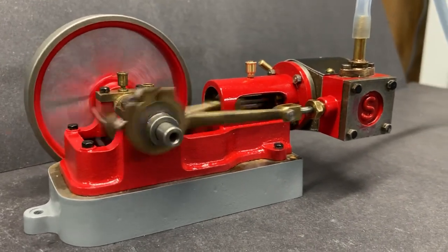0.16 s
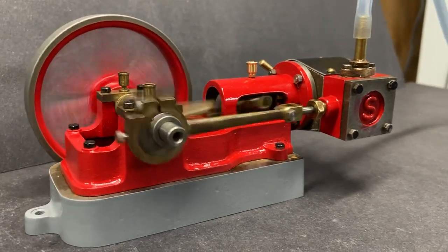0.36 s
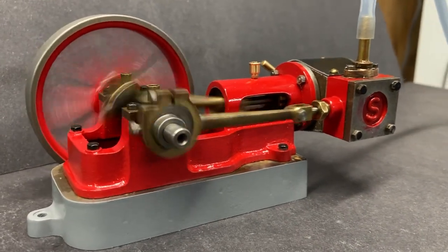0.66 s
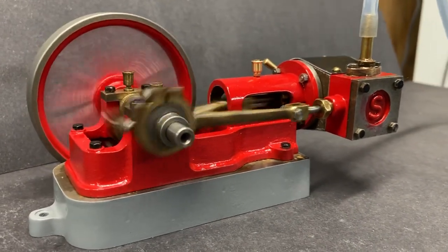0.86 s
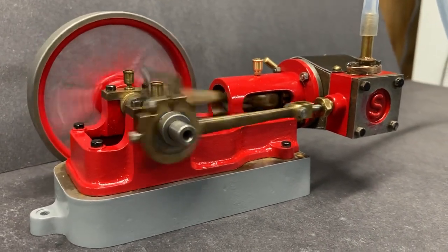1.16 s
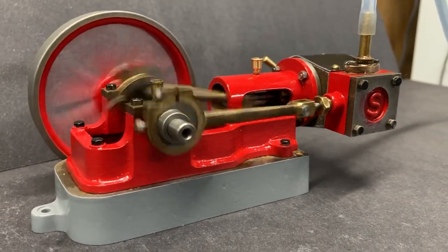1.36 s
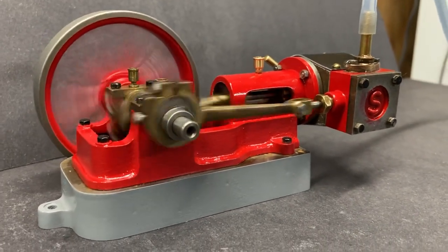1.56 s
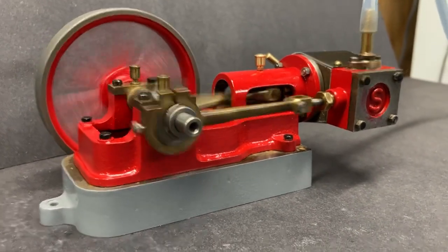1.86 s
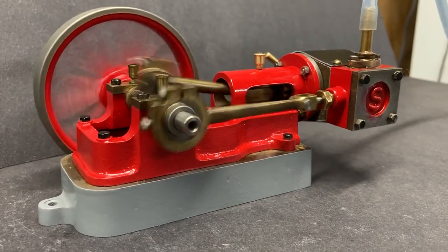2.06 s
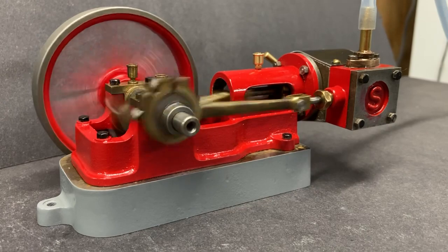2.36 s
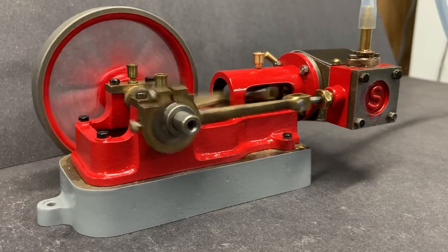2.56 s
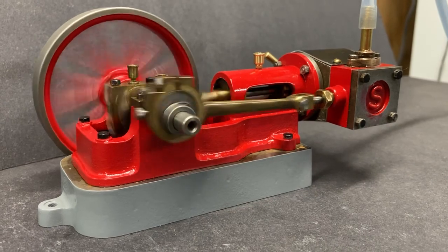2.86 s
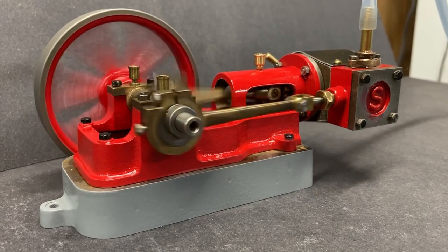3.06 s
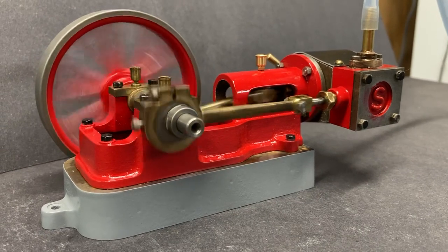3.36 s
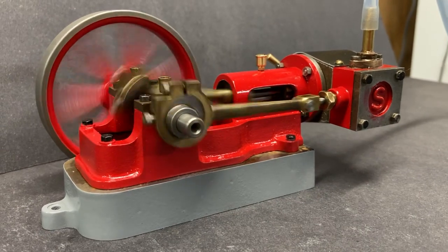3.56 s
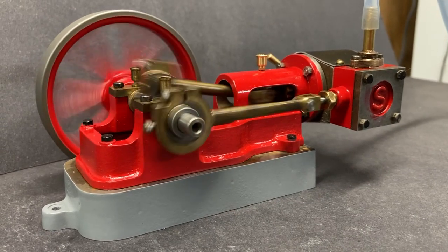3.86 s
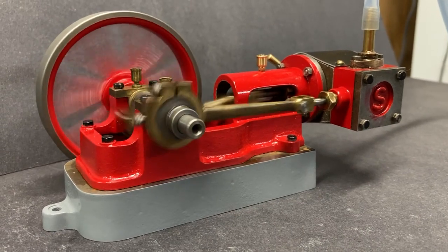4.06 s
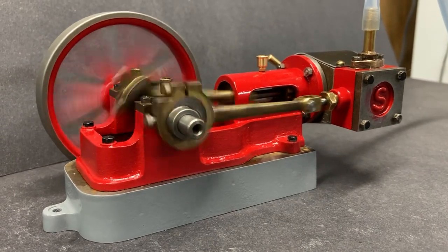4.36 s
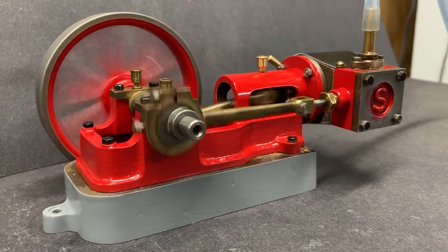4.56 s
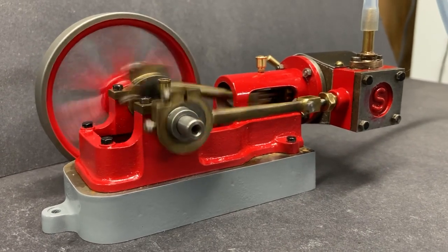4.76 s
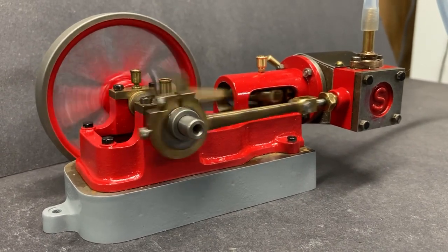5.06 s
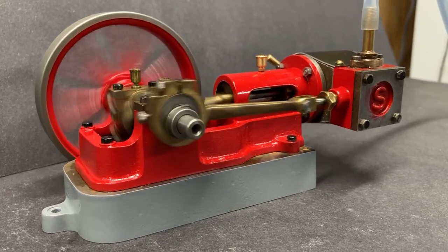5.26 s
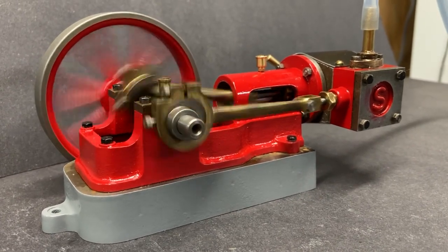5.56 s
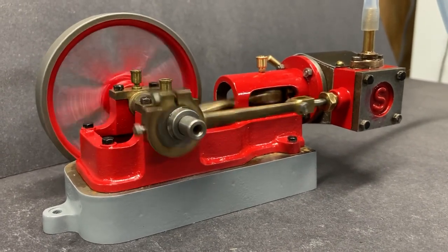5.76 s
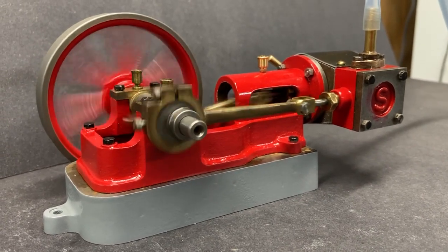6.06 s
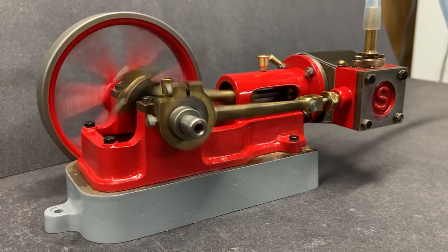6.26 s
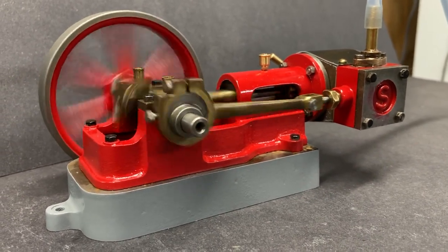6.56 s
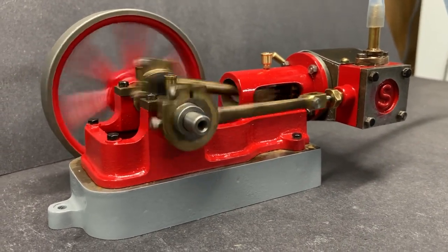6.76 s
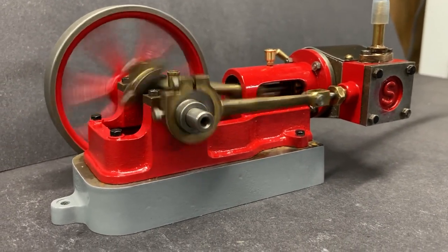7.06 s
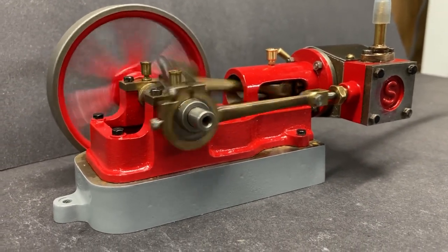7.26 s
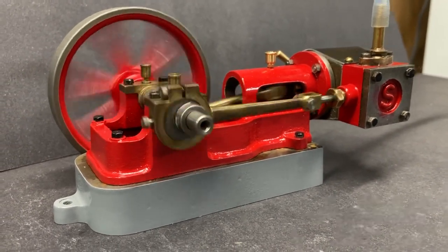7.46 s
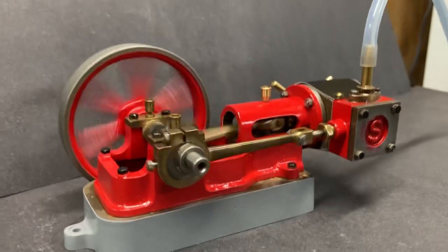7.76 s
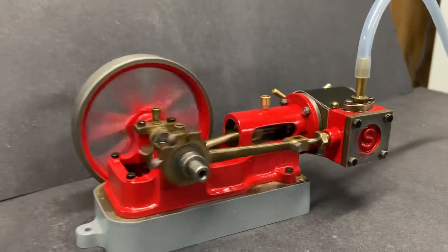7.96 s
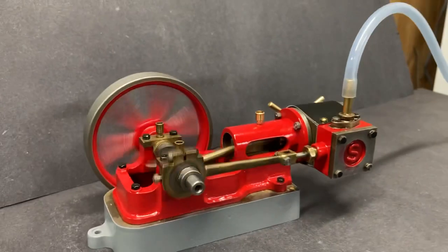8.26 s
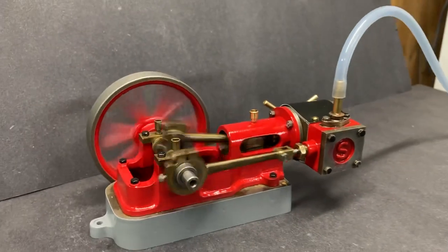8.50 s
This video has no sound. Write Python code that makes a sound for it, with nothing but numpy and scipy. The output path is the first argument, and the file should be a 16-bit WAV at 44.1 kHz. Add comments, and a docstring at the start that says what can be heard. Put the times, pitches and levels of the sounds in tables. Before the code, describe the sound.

From 0 s a small model engine is already running on compressed air, very close, in a small room. Each turn repeats a tight round of dry metallic knocks, ticks, rod rattle and a low bench thump, at about 8.5 turns a second, never quite identical. Two bright hissing exhaust puffs per turn sweep slightly up and down, speckled with tiny oil cracks; sharper spits come at 0.2 and 2.3 s. Steady leaking air, thin whistles and low rumble lie beneath. From about 2.5 s the pace eases to about 7.5 turns a second, with looser, more prominent bearing slap and rattles. After 6 s it slows further, to just above six turns a second around 6.7 s, puffs weakening. Between 7.5 and 7.9 s the microphone draws back: main knocks soften, the thin top hiss and hollow ring stand out more. The engine keeps running to the end at about 8.6 s.

```python
"""A small single-cylinder model steam engine knocks on a workbench, run on compressed air at six to nine turns a second.
Slack in rod and bearings gives every turn the same round of knocks, never quite alike; they ring frame and bench.
Each turn also lets two hissing puffs out of the exhaust, with small cracks of spitting oil.
Air leaks steadily, with faint whistles and a hollow ring, over a low room rumble.
A close microphone pair hears it in a small room and draws back from the engine near the end."""
import sys
import numpy as np
from scipy import signal
from scipy.fft import rfft, irfft
from scipy.io import wavfile

SR = 44100
rng = np.random.default_rng(int(sys.argv[2]) if len(sys.argv) > 2 else 0)


def pcm_store(signal):
    """Save signal as 16-bit PCM."""
    levels = np.round(np.clip(np.atleast_2d(signal), -1, 1) * 32767)
    wavfile.write(sys.argv[1], SR, levels.astype(np.int16).T)


N = 380583
TIME, HZ = np.arange(N) / SR, np.fft.rfftfreq(N, 1 / SR)
USUAL_SPEED = 7.6  # turns a second at which the table levels hold


# the turns of the crank: (start [s], then the force [dB] of the crank knock, its bright tick,
#   the rod's rattle, the thump on the bench, the return blow, the scrape)
TURNS = [(0.0021, -1, -12, -14, -2, -3, 0.0), (0.1171, 1, 0, -3, 1, -1, 2),
         (0.2358, 1, 0.0, -4, -2, 1, -13), (0.3543, 1.5, -4.0, -7.0, 4, -2, -2.0),
         (0.4715, 0, -4, -2, 0, -0.5, 2), (0.5878, 2, -3.0, -1.5, -2, -2, -12),
         (0.7057, 1.5, -3, -7.0, 2, -3, 0), (0.8218, 0.5, -2.0, -7.0, -2, 1, 3),
         (0.9374, -0.5, -7.5, -11, 2.5, -1.5, -12), (1.0534, 0, 6, -14, 1.5, -6, -3),
         (1.1687, 0.5, -3, -11, 2, 0, 3), (1.2828, 1.5, 2.5, -9, 1, 0.5, -10.0),
         (1.3978, 1.5, 5.0, -5, 2.5, -2, -5.5), (1.5125, 1, 3.0, 3, 1.5, 0, 6),
         (1.6264, 2, 4, -2, 0, -0.5, -7.0), (1.74, 2, 5.0, -9, 2.5, 0.5, -1),
         (1.8548, 0, 3, -4.5, 1.5, -0.5, -3), (1.9691, -1, 8.5, -2, 2.0, -1, 4),
         (2.0843, 1, 7.0, -3, 1.5, -3, -9), (2.2014, 0.5, 4, -9, -1.5, -1.5, 2.0),
         (2.3177, -3, 2, -9, 0.5, -1.5, 0), (2.4344, -1, 6.5, -7.0, 2.5, -4.5, -12),
         (2.552, -1.0, 4, 4, -0.5, -1, -7), (2.6718, 0, 8, -3, -0.5, -2, -10.0),
         (2.7993, 1, 2.0, 1, -3, -0.5, -9), (2.9286, 1, 1, 8.5, -1.5, -3.5, 5.0),
         (3.0603, 0.5, -3, -7.0, -1, 0.5, 0), (3.1955, 2, 3.0, 2.0, 1.5, -2, 7),
         (3.3321, 1.5, 1.0, 0, -1, 0, 6), (3.4728, -1.5, 7.5, -5, -4, -0.5, 6.5),
         (3.6125, 0.5, 3, -4, -2.5, 1, 5.5), (3.7502, -0.5, -3, -1.0, -2, 1.5, 4),
         (3.8856, 1.5, 3.0, -7, -1.5, -1, -10.0), (4.0182, 2, -3.0, -3.0, 1.5, -3, -9.5),
         (4.1504, -2, 2, 5.5, -0.5, -1.5, -1.0), (4.2802, -0.5, 1.5, 1, -7, -4, 6.5),
         (4.4076, -1, -3, -8, 0, 0.5, -10.0), (4.5367, 2, 4, -1, 1, -2, -3),
         (4.6649, 0.5, 1, 8, -2.5, -3.5, 1.5), (4.7951, 1.0, 5, -2, 1, -1, 7.5),
         (4.929, -1.5, -7.0, 0, 0.5, 1.5, 0.5), (5.0653, 0.5, -2, -7, 2.5, -0.5, -10.0),
         (5.2004, 0.0, -4, -9, 1.0, -2.5, -10.0), (5.3352, -3, -0.5, 2.5, -2.5, -1.5, -10.0),
         (5.4699, -2.5, -3.0, 6.0, -3.5, -0.5, -1.0), (5.6061, -1.5, 4, 10, 0.5, -1, -10.0),
         (5.7424, -0.5, 4, 9, -2.5, -3, -7.0), (5.8817, 1, 5, 10.0, -3.5, -4.5, -8),
         (6.0227, 0.5, -1, 8.5, -3.5, -1.5, -10.0), (6.1653, 0, 2, -1.5, 0.0, -0.5, -6),
         (6.3127, 0, -5, -14, 0, 2.5, -5.5), (6.4684, 0.0, -2.0, 8, -8.0, -4, -10.0),
         (6.6294, -0.5, -9, -5, -5, -1, -10.0), (6.797, -0.5, -5.5, -11, -2, 1, 2.0),
         (6.9583, 0.0, -1.0, 7.5, -2.5, -2.5, -10.0), (7.114, 0, -1.5, -7.0, -2, -0.5, 0),
         (7.2714, -0.5, -2.0, 7.5, -3, -4, -10.0), (7.4296, -2, -8, -7.0, -1.0, -2.5, -8),
         (7.5895, -2.5, -3, 3, 0.5, -1.0, -3), (7.7455, -6, -10.0, 1, -10, 0.5, -12),
         (7.9078, -4.5, -7.5, -7.0, -3, 1, 0), (8.0649, -5, -8, 4.5, -4, -4.5, -12),
         (8.2194, -5.5, -7, -7.0, -6.5, -5.5, -5), (8.3687, -6.5, -3.0, -5, -1.5, -3.5, 0.5),
         (8.52, -5, 0, 5.5, -2, -3, -9)]
# names of those forces, in column order
DRIVES = ["knock", "tick", "rattle", "thump", "return", "scrape"]
# slap of the crank bearing: (time [s], level above the force of the knock [dB])
SLAP = [(0, -10), (2.35, -4), (2.7, -1.5), (5.5, 0), (5.75, 0.5), (6.15, 1), (6.4, -0.5), (7.5, 0.5),
        (8, 5.5), (8.63, 3)]


def turns(even_back_db=-3.0):
    """When each turn starts, and how hard it drives each kind of blow, in dB."""
    start, *columns = np.transpose(TURNS)
    forces = dict(zip(DRIVES, columns))
    forces["slap"] = forces["knock"] + np.interp(start, *np.transpose(SLAP))
    forces["even"] = even_back_db * drawn_back(start)
    return start, forces


def speed(t):
    """Turns a second above the usual speed, from the lengths of the turns."""
    start = np.transpose(TURNS)[0]
    middle = (start[1:] + start[:-1]) / 2
    return np.interp(t, middle, 1 / np.diff(start)) - USUAL_SPEED


def crank():
    """Turns that the crank has made, at every moment."""
    start = np.transpose(TURNS)[0]
    end = 2 * start[-1] - start[-2]  # the last turn lasts as long as the one before
    return np.interp(TIME, np.append(start, end), np.arange(len(start) + 1))


def strokes(cycle, drive, position, scatter, speed_db, vary_db, advance=0):
    """Times and strengths, turn by turn, of an event at one crank position; speed shifts its place and level."""
    start, forces = cycle
    period = np.append(np.diff(start), start[-1] - start[-2])
    faster = speed(start + period * position)
    late, harder = rng.standard_normal((len(start), 2)).T
    at = start + period * (position - advance * faster + scatter * late)
    return at, amp(forces[drive] + speed_db * faster + vary_db * harder)


# the blows of one turn: (force that drives it, crank position [turns], part struck,
#   advance [turns per extra turn a second], scatter [turns], chatter decay [s],
#   level at each of the four colour frequencies [dB], gain with speed [dB per extra turn a second])
BLOWS = [ ("slap", 0.00704, "crank", 0, 0.0003, 0.00017, 2.2, 5.5, -1.6, -11.5, 0),
         ("tick", 0.014, "crank", 0, 0.00091, 0.001, -23, -34, -22, -4.5, 0),
         ("knock", 0.017, "crank", 0, .0005, 0.00045, 2.5, -9.5, 6.4, -15.5, 0.3),
         ("even", .078, "rod", 0.003, .002, 0.0008, 0, 1.4, -4.5, -10, 0.42),
         ("rattle", .118, "rod", 0, 0.005, 0.002, -2, -4.5, -10, -18, -0.71),
         ("rattle", .168, "rod", 0, .005, 0.002, 0, -12, -10, -20, -1),
         ("even", .35, "rod", 0, 0.005, 0.0022, 2.5, -0.026, -2.3, -17, 0.3),
         ("even", .449, "rod", -0.002, .004, 0.0017, 0, -1, 3.5, -15, 1.2),
         ("even", .56, "slide", 0.0037, 0.0044, 0.0014, 2, -3.5, -26, -36, 3.2),
         ("return", .598, "slide", .006, 0.0013, 0.00029, 8.2, 7.9, 1, -22, -0.42),
         ("even", .648, "slide", 0.0057, 0.0032, 0.0008, 1.7, -7, -30, -36, -0.5),
         ("scrape", .76, "rod", 0, 0.01, .002, -2.5, -4.5, -1, -9, 0)]
# colour frequencies: (frequency [Hz])
COLOUR_HZ = [200, 1000, 3000, 10000]


def blows(cycle, chatter=0.65, vary_db=0.73, chatter_low_hz=700, size=900):
    """Slack is taken up at fixed crank positions: a click and a brief chatter, as hard as that turn drives it."""
    t = np.arange(size) / SR
    thin = signal.butter(2, chatter_low_hz, "highpass", fs=SR)  # chatter is too light to move the bench
    clack = signal.butter(2, [900, 3400], "bandpass", fs=SR)
    out = np.zeros(N)
    for drive, position, part, advance, scatter, chatter_s, *colour_db, speed_db in BLOWS:
        at, force = strokes(cycle, drive, position, scatter, speed_db, vary_db, advance)
        fade = np.exp(-t / chatter_s)
        noise = rng.standard_normal((len(at), size)) * fade / np.linalg.norm(fade)
        contact = chatter * signal.lfilter(*thin, noise)
        contact[:, 0] += 1  # the click
        contact /= np.hypot(1, chatter)
        colour = causal(list(zip(COLOUR_HZ, colour_db)))
        contact = signal.fftconvolve(contact, colour[None], axes=1)
        sound = signal.fftconvolve(contact, frame(part, at), axes=1)
        # chatter changes a clack's colour, not its strength
        energy = np.linalg.norm(signal.lfilter(*clack, sound[:, :size]), axis=1)
        level = force * energy.mean() / energy
        out += placed(at, sound * level[:, None])
    return out


# modes of bench and engine frame: (frequency [Hz], width [Hz], relative level struck at the crank [dB],
#   at the rod [dB], at the slide [dB], level added once the microphone has drawn back [dB])
MODES = [(59, 9.1, -12, -7, 9, 2), (89, 29, 1, -1, -12, -9), (115, 16, -2, 8.5, 2, 1),
         (190.6, 12.5, -4, 9, 5.5, 2), (217, 99, 1.5, -11, 0.5, 0), (263, 57, 4, -0.5, 6.5, 4),
         (351, 44, 3.5, 3, 3.5, -1.5), (453, 43, 3.5, 0, -1, 2), (597, 40, -11, -2, -1.5, 6),
         (728, 31, -19, -5, -2, 0), (803, 98, -19, 0.5, -5.5, -3), (946, 100, -4.5, 1, -2.5, -3.5),
         (1112, 36, 1, 6, 3.5, 9), (1356, 230, 3.5, -4.5, -1.5, 1.5), (1624, 217, 7.5, 1.5, 3.5, 2),
         (1800, 306, 5, -0.5, 1.5, 1.5), (2163, 315, 1.5, -4, -1, 4.5), (2408, 335, 0.5, -2.5, -1, 2.5),
         (2636, 210, 0, -3.5, -2.5, -2), (3127, 132, 1, 2, -4.5, 1.5), (3328, 350, -4, -1.5, -4.5, -6),
         (4230, 2700, -17, -16, -18, 0), (5960, 600, -1, -11, -22, 3), (8740, 1200, 3, -8.5, -1.5, 0),
         (12300, 10500, -7.5, -11.5, -15.5, 4.5)]
# names of the parts struck, in column order
PARTS = ["crank", "rod", "slide"]


def frame(part, at, vary_db=2.0, detune=0.018, level_db=-0.72, size=5000):
    """Ring of bench and iron frame, a row a stroke: the contact point shifts, so the modes differ a little."""
    t = np.arange(size) / SR
    hz, width, *part_db, back_db = np.transpose(MODES)
    decay = np.exp(-np.pi * np.outer(width, t))
    rings = 2 * np.pi * width[:, None] / SR * decay * np.sin(2 * np.pi * np.outer(hz, t))
    chance = rng.standard_normal((len(at), len(hz) + 1))
    mode_db = level_db + part_db[PARTS.index(part)] + np.outer(drawn_back(at), back_db)
    mode_db = mode_db + vary_db * chance[:, 1:]
    weights = (-1) ** np.arange(len(hz)) * amp(mode_db)  # neighbouring modes start in opposite directions
    stretch = 1 + detune * chance[:, 0]
    return np.array([np.interp(t * k, t, ring) for ring, k in zip(weights @ rings, stretch)])


def clatter(per_s=40, level_db=-16, spread_db=3.0, low_hz=1100, high_hz=4500):
    """Loose pins and the valve gear tick lightly at random moments, ringing the frame through the rod."""
    at = TIME[rng.random(N) < per_s / SR]
    force = amp(level_db + spread_db * np.minimum(rng.exponential(1, len(at)), 4))
    ticks = placed(at, force[:, None] * frame("rod", at, size=2000))
    return signal.lfilter(*signal.butter(2, [low_hz, high_hz], "bandpass", fs=SR), ticks)


# the piston's shoves swell a mode of the bench top, and the rattling rod makes the frame clank:
#   (force that drives it, crank position [turns], rise [s], fall [s], frequency [Hz], level [dB],
#   gain with speed [dB per extra turn a second])
SHOVES = [ ("thump", .457, .008, .009, 185, -24.3, -0.2),
          ("thump", 0.41, 0.0013, 0.0076, 274.6, -33.5, -1.4), ("even", .37, 0.0034, 0.006, 455, -37, 0.53),
          ("even", 0.59, 0.0028, 0.003, 457, -41, 2.1), ("return", .64, 0.0024, 0.012, 210, -35.5, -1.4),
          ("slap", 0.0418, 0.00053, 0.0051, 271, -34.5, -3),
          ("rattle", 0.2133, 0.0035, 0.0054, 201, -38, -1.2),
          ("rattle", .12, 0.0024, 0.0027, 963, -41, -.5), ("rattle", 0.18, 0.0013, .005, 1106, -48.5, -.5),
          ("even", 0.0852, 0.0036, 0.006, 200, -32, -1.7)]


def bench(cycle, scatter=0.0026, vary_db=0.4, detune=0.028):
    """Each stroke rocks the bed: one bending mode of bench top or frame swells briefly and dies away."""
    t = np.arange(-SR // 25, SR // 12) / SR
    out = np.zeros(N)
    for drive, position, rise, fall, hz, db, speed_db in SHOVES:
        at, force = strokes(cycle, drive, position, scatter, speed_db, vary_db)
        swell = np.where(t < 0, np.exp(-.5 * (t / rise) ** 2), np.exp(1 - np.hypot(1, t / fall)))
        pitch = hz * (1 + detune * rng.standard_normal((len(at), 1)))
        out += placed(at + t[0], amp(db) * force[:, None] * swell * np.cos(2 * np.pi * pitch * t))
    return out


# exhaust puffs: (crank position [turns], half length [turns], level [dB])
PUFFS = [(0.305, 0.125, 1), (0.81, 0.125, 2.5)]


def valve(steepness=2.4, lean=0.04, vary_db=1.43):
    """How far the exhaust is open, 0-1, and the strength of the puff: once a turn from each end of the cylinder."""
    angle = crank()
    opening, strength_db = np.zeros(N), np.zeros(N)
    for position, length, db in PUFFS:
        turn, away = np.divmod(angle - position + .5, 1)
        away = (away - .5) / length
        away *= 1 - lean * np.sign(away)  # opens faster than it closes
        puff = np.exp(-.5 * abs(away) ** steepness)
        puff_db = db + vary_db * rng.standard_normal(int(angle[-1]) + 2)  # one level a turn
        opening += puff
        strength_db += puff * puff_db[turn.astype(int)]
    return opening, amp(strength_db)


# resonances of the exhaust port: (frequency wide open [Hz], width [Hz], level [dB],
#   drop in frequency when shut [Hz], power of the opening that the level follows)
PORT = [(520, 800, -32.5, 100, 2.4), (2660, 1000, -37, 300.5, 3), (3724, 516, -26, 550, 0.78),
        (4300, 630, -33, 400, 3), (7820, 860, -30, 301, 3), (8427, 443, -13, 300, 1.44),
        (9920, 400, -23.5, 0, 0.61), (14100, 1500, -31.5, -2, 0.83)]


def exhaust(opening, strength, top_hz=12600, top_width_hz=1500, top_db=-36.0, rush_db=-44, top_steady=0.18):
    """The jet sounds the port's resonances, nearly all sweeping up as the valve opens and down as it shuts."""
    jet = opening * amp(rush_db) * rng.standard_normal(N)
    for hz, width, db, drop_hz, power in PORT:
        sweep = np.exp(2j * np.pi * np.cumsum(drop_hz * (opening - 1)) / SR)
        resonance = signal.hilbert(hiss(amp(db) * peak(hz, width)))
        jet += opening ** power * (resonance * sweep).real
    # the top hiss is beamed, so it depends on where one listens
    top = air("top") * hiss(amp(top_db) * peak(top_hz, top_width_hz))
    return strength * (air("exhaust") * jet + (opening + top_steady) * top)


# the exhaust, its thin top hiss and the hollow ring follow the air supply, as the speed does:
#   sound: (usual level [dB], gain with speed [dB per extra turn a second],
#   level added once the microphone has drawn back [dB])
AIR_LAWS = {"exhaust": (-3, 1.9, -4), "top": (-4, 3.2, 13.7), "hollow": (-11, 2.5, 5.6)}


def air(sound):
    """Gain of one sound of the air: it grows with the speed and changes with the place of the microphone."""
    usual_db, speed_db, back_db = AIR_LAWS[sound]
    return amp(usual_db + speed_db * speed(TIME) + back_db * drawn_back(TIME))


# drops of oil that spit loudly from the exhaust: (time [s], peak level [dB])
SPITS = [(0.222, -23), (2.292, -16)]


def spits(opening, per_s=70, level_db=-41, spread_db=3, fade_s=0.00082, size=200):
    """Oil in the jet bursts into tiny bright cracks, more often the wider the valve; a few loud ones are set."""
    at = TIME[rng.random(N) < per_s * opening / SR]
    db = level_db + spread_db * np.minimum(rng.exponential(1, len(at)), 4)
    at, db = np.vstack([SPITS, np.column_stack([at, db])]).T
    cracks = rng.standard_normal((len(at), size)) * np.exp(-np.arange(size) / SR / fade_s)
    cracks = signal.lfilter(*signal.butter(2, [7500, 13000], "bandpass", fs=SR), cracks)
    return placed(at, cracks * (amp(db) / abs(cracks).max(1))[:, None])


# the microphone draws back from the engine: (from [s], until [s])
DRAW_BACK_S = (7.47, 7.93)


def drawn_back(t):
    """How far the microphone has drawn back, 0-1."""
    return np.interp(t, DRAW_BACK_S, [0, 1])


def room(x, near_db=-11.0, near_t60=0.034, far_db=-13, far_t60=0.17):
    """Quick echoes from bench and wall, then a short tail; weak in bass and top, different at each microphone."""
    t = np.arange(SR // 3) / SR
    taps = rng.standard_normal((2, len(t))) * (t > .002)
    near, far = amp(-60 * t / near_t60), amp(-60 * t / far_t60)
    tail = taps * (amp(near_db) * near / np.linalg.norm(near) + amp(far_db) * far / np.linalg.norm(far))
    wet = shaped(x, amp(read([(180, -3.0), (500, 5.5), (5000, 5.5), (7500, -6.5)], HZ)))
    return signal.oaconvolve(wet[None], tail, axes=1)[:, :N]


# leaking air, before it follows the supply: (frequency [Hz], gain on white noise [dB])
LEAK = [(500, -33), (1000, -39.5), (1750, -35), (2600, -39), (3300, -35), (4300, -38.5), (5500, -38),
        (6500, -37), (7200, -38.5), (8300, -29.5), (9300, -63), (10800, -39.5), (14500, -52.5),
        (16000, -42)]
# thin whistles in the leak: (frequency [Hz], width [Hz], gain on white noise [dB])
WHISTLES = [(778, 10, -27), (3748, 50, -28), (7004, 43, -27), (7083, 25, -30), (7302, 38, -29),
            (7495, 35, -28), (8022, 40, -27)]
# room rumble: (frequency [Hz], gain on white noise [dB])
RUMBLE = [(15, -42), (32, -40), (52, -15), (112, -14), (190, -18.5), (300, -23.5), (500, -33), (900, -39.5),
          (3000, -72)]


def background(hollow_hz=1118, hollow_width_hz=45, hollow_db=-20.5, leak_follows=0.04):
    """Leaking air with faint whistles, low room rumble and a hollow ring, all as filtered noise."""
    whistles = sum(amp(db) * peak(hz, width) for hz, width, db in WHISTLES)
    leak = air("exhaust") ** leak_follows * pair(np.hypot(amp(read(LEAK, HZ)), whistles))
    hollow = air("hollow") * pair(amp(hollow_db) * peak(hollow_hz, hollow_width_hz))
    rumble = pair(amp(read(RUMBLE, HZ)))
    return leak + hollow + rumble


# likeness of diffuse noise at the two microphones: (frequency [Hz], correlation [0-1])
LIKENESS = [(50, .94), (200, .94), (500, .7), (1200, .55), (3000, .5), (5500, .45), (7000, .85),
            (15000, .7)]


def pair(gain):
    """Diffuse noise at both microphones, partly alike."""
    alike = read(LIKENESS, HZ)
    common = hiss(gain * np.sqrt((1 + alike) / 2))
    apart = hiss(gain * np.sqrt((1 - alike) / 2))
    return np.array([common + apart, common - apart])


def amp(db):
    """Decibels to gain."""
    return 10 ** (np.asarray(db) / 20)


def read(points, hz):
    """A table joined by straight lines on a log-frequency axis."""
    f, value = np.transpose(points)
    return np.interp(np.log(hz + 1), np.log(f + 1), value)


def shaped(x, gain):
    """Filters x by a gain for every frequency."""
    return irfft(rfft(x) * gain, N)


def hiss(gain):
    """Random air noise with the given spectrum."""
    return shaped(rng.standard_normal(N), gain)


def peak(hz, width):
    """Gain of a resonance with steep skirts, halved at half the width to either side."""
    return 1 / (1 + (2 * (HZ - hz) / width) ** 2)


def causal(points, size=4096):
    """The shortest click that has the given spectrum (minimum phase)."""
    log_gain = np.log(amp(read(points, abs(np.fft.fftfreq(size, 1 / SR)))))
    return np.fft.ifft(np.exp(np.conj(signal.hilbert(log_gain)))).real[:size // 2]


def placed(times, sounds):
    """Lays one sound a row onto the time line, each at its own start time."""
    index = (times * SR).astype(int)[:, None] + np.arange(sounds.shape[1])
    return np.bincount(index[index >= 0], sounds[index >= 0], N)[:N]


def scene():
    """Knocks, ticks, thumps, puffs and spits in the room, over the background."""
    cycle = turns()
    opening, strength = valve()
    engine = blows(cycle) + clatter() + bench(cycle)
    engine += exhaust(opening, strength) + spits(opening)
    return engine + room(engine) + background()


# phase between the microphones: (frequency [Hz], lead of the left [radians])
LEAD = [(0, 0), (250, .1), (800, 1), (1500, 2.2), (2000, 3.6), (2600, 6.3), (3600, 6.2), (4600, 7),
        (5200, 9.3), (6000, 8.7), (6450, 6.3), (7450, 6.15), (7700, 5.1), (8400, 4.05), (9200, 3.14),
        (9700, 2.8), (10350, 1.5), (10700, .15), (11700, -.1), (12300, -1.1), (13100, -3), (14200, -3.45),
        (14900, -5.3), (15250, -6.28)]
# balance of the microphones: (frequency [Hz], left above right [dB])
BALANCE = [(120, -0.5), (280, 0.5), (480, 3.5), (750, 3.5), (1200, 0.5), (2400, 1.5), (3500, 4), (4800, -1),
           (6500, 0)]


def record(dry, low_cut_hz=40, edge_hz=15850):
    """The two microphone ports differ in phase and level; then the low cut and the band limit."""
    lead = np.interp(HZ, *np.transpose(LEAD))
    left = amp(read(BALANCE, HZ) / 2) * np.exp(.5j * lead)  # half the difference at each port
    heard = shaped(dry, np.array([left, 1 / left]))
    heard = signal.lfilter(*signal.butter(2, low_cut_hz, "highpass", fs=SR), heard)
    band_limit = signal.firwin(511, edge_hz, window=("kaiser", 9), fs=SR)
    return signal.oaconvolve(heard, band_limit[None], "same")


dry = scene()
out = record(dry)
pcm_store(out)
```